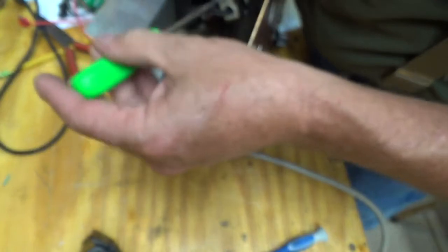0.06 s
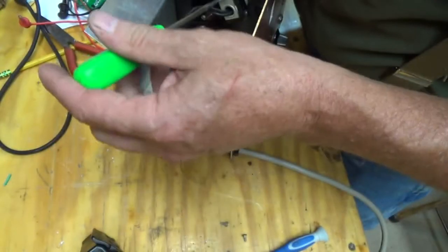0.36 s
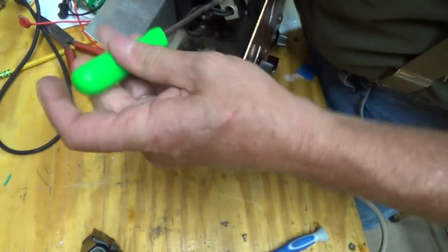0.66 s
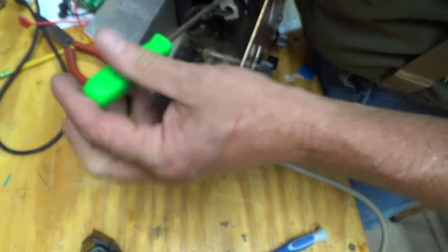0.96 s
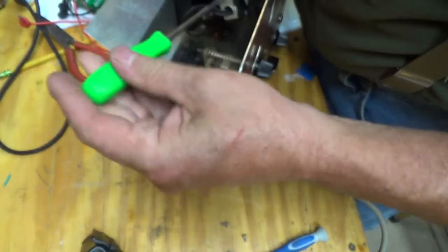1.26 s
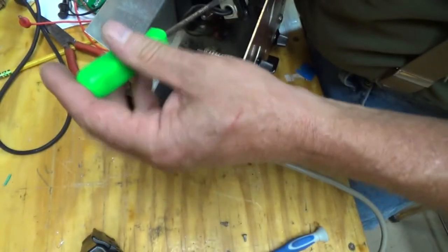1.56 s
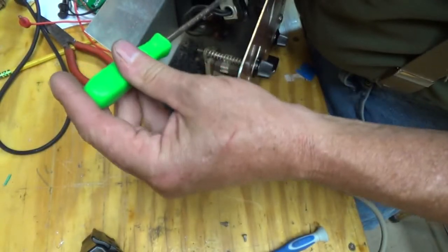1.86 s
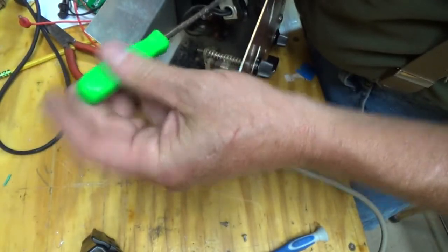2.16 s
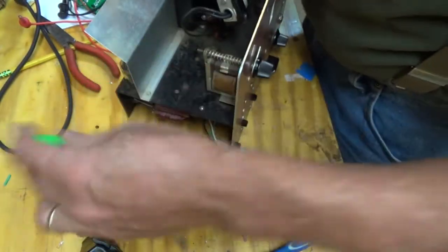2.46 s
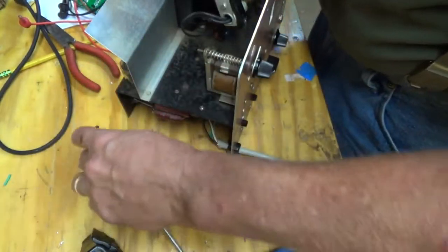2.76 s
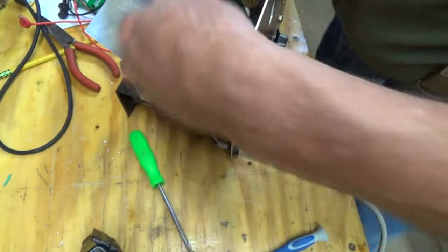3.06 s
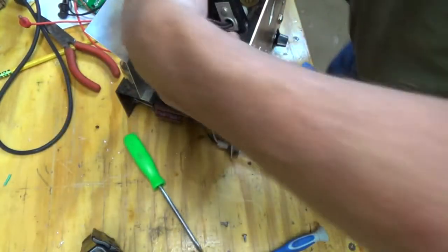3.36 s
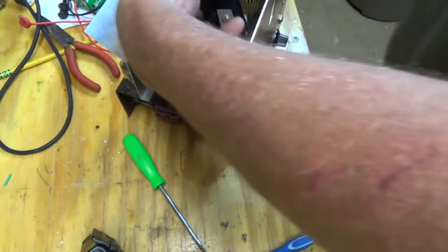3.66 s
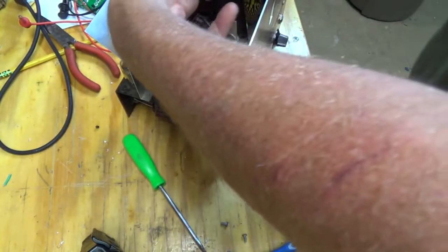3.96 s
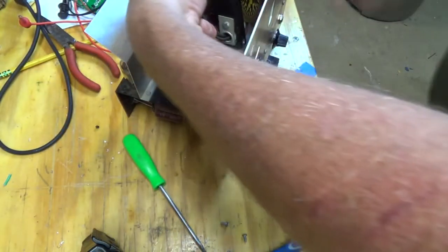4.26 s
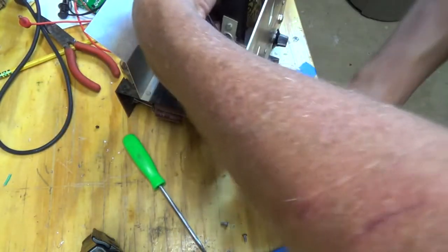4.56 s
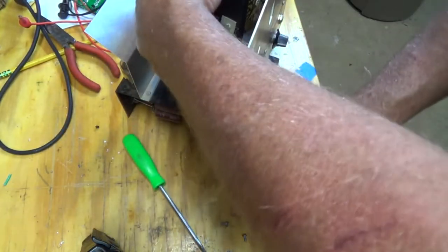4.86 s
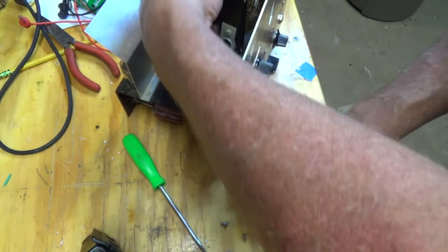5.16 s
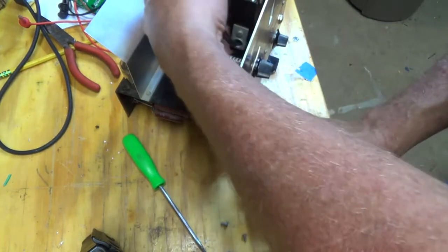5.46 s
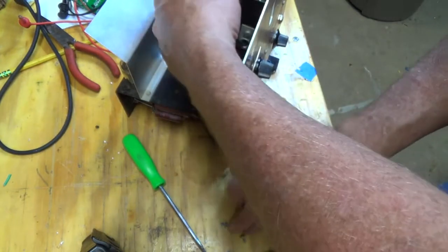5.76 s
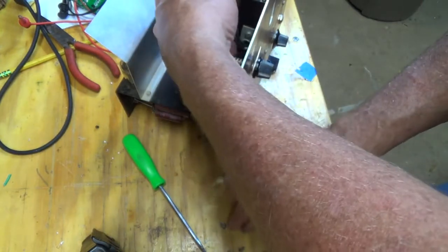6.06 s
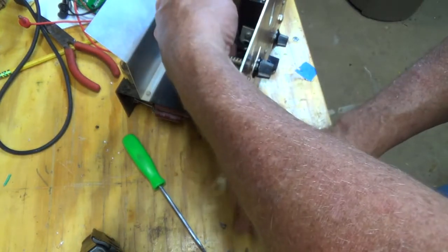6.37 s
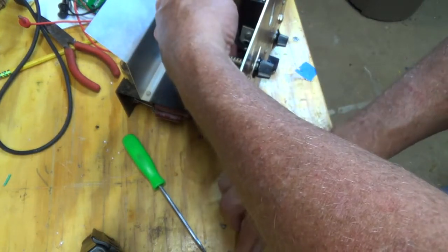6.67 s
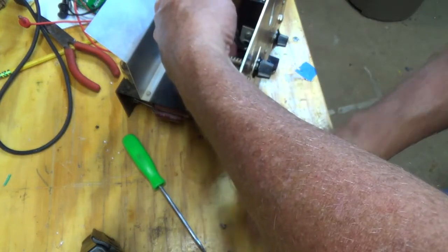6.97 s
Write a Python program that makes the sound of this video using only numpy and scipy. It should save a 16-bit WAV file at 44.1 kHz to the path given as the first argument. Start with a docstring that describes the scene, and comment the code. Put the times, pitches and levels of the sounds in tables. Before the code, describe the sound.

Soft finger taps, a tool tumbling on wood, then rustling clothes and tinny knocks as a metal chassis is tipped.

```python
"""Sheet-metal chassis on a workbench

In a small workshop, fingers fiddle with a screwdriver and set it down; it tumbles on the wooden bench
and rolls to rest. Clothes rustle and a hand hisses over the chassis, which scrapes, knocks and clanks
as it is tipped, a low boom after each knock. Room air, mains hum and a picture tube's whine lie beneath."""
import sys
import numpy as np
from scipy import signal
from scipy.fft import rfft, irfft, next_fast_len
from scipy.io import wavfile
from scipy.ndimage import uniform_filter1d, minimum_filter1d

SR = 44100
rng = np.random.default_rng(int(sys.argv[2]) if len(sys.argv) > 2 else 0)


def transcribe(signal):
    """Save signal, clipped to [-1, 1], as a 16-bit WAV file at the path in sys.argv[1]."""
    frames = np.atleast_2d(signal).T
    limited = np.clip(frames, -1, 1)
    pcm = np.round(limited * 32767).astype(np.int16)
    wavfile.write(sys.argv[1], SR, pcm)


N = 313551
BLOW_SIZE = 2 ** 15   # samples for one hit and its tail
TIME = np.arange(N) / SR
AGE = TIME[:BLOW_SIZE]

# The woody ring of the bench. Each row: pitch in Hz, relative level in dB, t60 in seconds.
BENCH_MODES = [(138.5, -7, 0.5), (205.7, -20, 1), (283, 2.5, 0.24), (344, -8, 0.15), (468, -17, 0.69),
               (542, -21.5, 0.0754), (691, -8, 0.22), (1234, -2, 0.17), (1173, -9.5, 0.58),
               (1307, -15, 0.7), (1476, -18.5, 0.22), (1630, -5, 0.147), (1510, -2, 0.28),
               (1817, 5.5, 0.088), (1890, -5, .22)]
# The tinny ring of the chassis. Each row: pitch in Hz, relative level in dB, t60 in seconds.
CHASSIS_MODES = [(286.5, 2.5, 0.45), (404, -6, 0.72), (564.3, -1.5, 0.48), (768, 0.5, 0.45), (872, 7, 0.26),
                 (949, 10, 0.11), (1010, 12, 0.05), (1050, -1, 0.12), (1431, 11, 0.092), (1550, -17, 0.11),
                 (1748, 9, 0.053), (1927, 0.5, 0.14), (2454, -2, 0.15), (3010, -16, 0.14), (3610, -4, 0.1),
                 (5080, -11.5, 0.13)]
# Knocks of the chassis. Each row: start in seconds, strength in dB, hardness in dB,
# pitch of the struck spot in Hz, strength of the following boom in dB.
CHASSIS_KNOCKS = [(3.74, -44, -6, 890, -46), (4.236, -24, -1.5, 1363, -36), (4.254, -40, -2, 1190, -62),
                  (4.405, -33, -2.5, 1160, -32.5), (4.741, -43.5, 20.5, 1290, -29),
                  (4.774, -47.5, 15, 1300, -60), (4.878, -58.5, -8, 1300, -43),
                  (5.621, -56, 6.5, 1330, -61), (5.691, -30.5, 16, 1430, -31.5),
                  (5.967, -58, 10, 1510, -47.5), (6.046, -40, 3.5, 1500, -46),
                  (6.144, -43, -6.5, 1220, -40), (6.172, -49.5, -1, 1110, -72)]


def from_db(db):
    """Decibels to gain."""
    return 10 ** (np.asarray(db) / 20)


def rms(x):
    """Root mean square."""
    return np.sqrt(np.mean(x ** 2) + 1e-24)


def unit_energy(x):
    """Scale to an average energy of 1 per channel."""
    return x / (rms(x) * np.sqrt(x.shape[-1]))


def db_by_bin(points, size):
    """A curve of (Hz, dB) points read on the bins of a transform."""
    hz, db = np.transpose(points)
    return np.interp(np.log(np.fft.rfftfreq(size, 1 / SR) + 1), np.log(hz), db)


def decay(t60):
    """Envelope that falls 60 dB in t60 seconds."""
    return np.exp(-np.log(1000) * AGE / t60)


def swell(s, db, rise_s, fall_s):
    """Gain of a movement that peaks at s; it climbs 20 dB in rise_s and sinks 20 dB in fall_s."""
    distance = np.maximum((s - TIME) / rise_s, (TIME - s) / fall_s)
    return from_db(db - 20 * distance.clip(max=10))


def strokes(rows, fall_share=0.45):
    """Gain of a series of hand or arm strokes, each fading faster than it rose."""
    return np.sqrt(sum(swell(s, db, rise_s, fall_share * rise_s) ** 2 for s, db, rise_s in rows))


def tone(hz, db, phase=0):
    """A sine at an rms level in dB, with its phase in cycles."""
    return np.sqrt(2) * from_db(db) * np.sin(2 * np.pi * (hz * TIME + phase))


def stereo_noise(size, side_db=-14):
    """White noise, nearly the same in both channels."""
    mid, side = rng.standard_normal((2, size))
    return mid + from_db(side_db) * side * [[1], [-1]]


def coloured_noise(colour, width=((20, -14), (20000, -14))):
    """Steady stereo noise with a given spectrum and width; rms 1."""
    size = next_fast_len(N, True)
    mid, side = rfft(rng.standard_normal((2, size)))
    pair = mid + side * from_db(db_by_bin(width, size)) * [[1], [-1]]
    noise = irfft(pair * from_db(db_by_bin(colour, size)), size)[:, :N]
    return noise / rms(noise)


def click(colour):
    """The tightest causal pulse with a given spectrum."""
    cepstrum = irfft(np.log(from_db(db_by_bin(colour, BLOW_SIZE))))
    cepstrum[1:BLOW_SIZE // 2] *= 2
    cepstrum[BLOW_SIZE // 2 + 1:] = 0
    return unit_energy(irfft(np.exp(rfft(cepstrum))))


def ringing(modes, scatter_db=1.2, pan_spread=.1):
    """Decaying modes; strength, sign and pan are drawn anew, as each blow lands somewhere else."""
    out = 0
    for hz, db, t60 in modes:
        gain = rng.choice([-1, 1]) * from_db(db + scatter_db * rng.standard_normal())
        pan = 1 + pan_spread * rng.standard_normal() * np.array([[1], [-1]])
        out = out + gain * pan * np.sin(2 * np.pi * hz * AGE) * decay(t60)
    return unit_energy(out)


def blows(rows, shares, colour, modes, chatter_db, chatter_t60, spot_db, spot_t60,
          ring_db, room_db, side_db):
    """Each hit is a click, a brief chatter, the ping of the struck spot, body ring and room tail."""
    # The four registers of a hit: knock, thud, clack, tick. Each row: low edge in Hz, high edge in Hz,
    # t60 of the room tail in seconds, relative tail level in dB.
    registers = [(633, 1610, 0.28, 4.5), (81, 647, 0.41, -1.5), (2013, 5150, 0.32, -2.5),
                 (6120, 11600, 0.27, -5)]
    out = np.zeros((2, N + BLOW_SIZE))
    pulse = rfft(click(colour))
    bands = [signal.butter(3, [lo, hi], "band", fs=SR, output="sos") for lo, hi, _, _ in registers]
    build_up = 1 - np.exp(-AGE / 0.0028)   # reflections take a moment to arrive
    tails = [from_db(db) * unit_energy(build_up * decay(t60)) for _, _, t60, db in registers]
    for s, strength_db, hardness_db, spot_hz in rows:
        contact = from_db(chatter_db) * unit_energy(rng.standard_normal(BLOW_SIZE) * decay(chatter_t60))
        contact[0] += 1   # the click itself
        spot = from_db(spot_db) * unit_energy(np.sin(2 * np.pi * spot_hz * AGE) * AGE * decay(spot_t60))
        direct = irfft(rfft(contact) * pulse) + spot + from_db(ring_db) * ringing(modes)
        diffuse = from_db(room_db) * irfft(rfft(stereo_noise(BLOW_SIZE, side_db)) * pulse)
        start = round(s * SR)
        # hardness shifts the balance of the registers, each levelled on its first 20 ms
        for band, tail, (share_db, slope) in zip(bands, tails, shares):
            part = signal.sosfilt(band, direct + diffuse * tail)
            strength = from_db(strength_db + share_db + slope * hardness_db)
            out[:, start:start + BLOW_SIZE] += strength * part / rms(part[:, :SR // 50])
    return out[:, :N]


def room_air(level_db=-59):
    """The low, steady hush of a still room."""
    # Colour of the hush. Each row: frequency in Hz, relative noise density in dB.
    colour = [(15, -48.5), (25, -41.5), (69, -5), (93, -13), (118, 4.5), (167, -14), (196, -8.5),
              (501, -13.5), (709, -14.5), (1310, -18), (1630, -18.5), (3350, -20), (5420, -24),
              (13800, -24.5), (15000, -27.5)]
    # Its stereo width. Each row: frequency in Hz, side against mid in dB.
    width = [(30, 7.5), (70, -69.5), (250, -7), (1000, -11.5), (4000, -24), (12000, -15)]
    return from_db(level_db) * coloured_noise(colour, width)


def mains_hum(waver_db=1.3):
    """Mains hum and a faint motor tone, wavering a little in level."""
    # The tones of the hum. Each row: pitch in Hz, level in dB.
    partials = [(60, -83), (119.7, -64.5), (179.5, -78.5), (434.6, -82)]
    knots = np.linspace(0, TIME[-1], num=50)
    out = 0
    for hz, db in partials:
        waver = np.interp(TIME, knots, rng.standard_normal(len(knots)))
        out = out + tone(hz, db + waver_db * waver, rng.random())
    return out


def tube_whine(line_hz=15734.3, field_hz=59.94, whine_db=-64.5, sideband_db=-11, fall_db=2.3):
    """A picture tube's line whistle, with ever weaker tones below it spaced at the field rate."""
    levels = [whine_db] + [whine_db + sideband_db - fall_db * k for k in range(7)]
    return sum(tone(line_hz - k * field_hz, db, rng.random()) for k, db in enumerate(levels))


def beating_whine():
    """A second thin whistle just above the tube's; the two beat."""
    return tone(hz=15747.3, db=-69)


def fingers(spot_hz=657):
    """Fingers tap the tool and small parts, with a short dull rub of skin as they grip."""
    # The touches. Each row: time in seconds, strength in dB, hardness in dB, rub level in dB.
    touches = [(0.362, -53.5, 1.5, -57.5), (0.619, -69, 3, -54.5), (0.769, -61.5, 30.5, -66),
               (1.272, -64, 8.5, -59), (1.398, -62.5, 1, -57), (1.735, -69, -13, -62),
               (2.002, -61, -21, -55), (2.228, -63.5, 14, -70), (2.511, -61.5, -3, -79),
               (6.751, -75, -10, -53), (6.909, -62.5, -10, -56)]
    # A tap's knock, thud, clack and tick. Each row: offset in dB, dB gained per dB of hardness.
    shares = [(1, -0.1), (0.5, -.05), (-15, 0.89), (-8, 0.92)]
    # Colours of the tap and of the rub. Each row: frequency in Hz, relative density in dB.
    tap_colour = [(90, 5), (250, 4.5), (500, 0), (1000, -8), (2000, -16.5), (5000, -17.5), (10000, -12),
                  (15000, -5.5)]
    rub_colour = [(90, -22), (260, 43.5), (500, 37.5), (1000, -22), (2000, 9), (5000, -14), (10000, -46),
                  (15000, -60)]
    hits = [(s, db, hardness_db, spot_hz) for s, db, hardness_db, _ in touches]
    taps = blows(hits, shares, tap_colour, BENCH_MODES, chatter_db=9.5, chatter_t60=0.018,
                 spot_db=-8, spot_t60=0.045, ring_db=-17, room_db=0.5, side_db=-17)
    grip = sum(swell(s, rub_db, rise_s=0.029, fall_s=0.089) for s, _, _, rub_db in touches)
    return taps + grip * coloured_noise(rub_colour)


def screwdriver(spot_hz=1390, hardness_db_per_octave=30):
    """The tool tumbles on the wood and rolls to rest; harder contacts ring higher."""
    # The tumble: the shaft hits hard, the handle soft.
    # Each row: start in seconds, strength in dB, hardness in dB.
    tumble = [(2.643, -23, -1.5), (2.667, -27, 1.5), (2.799, -47, 1.5), (2.838, -42, 0.5),
              (2.889, -15.5, 2), (2.907, -27.5, 9.5), (2.916, -25, 10), (3.0, -14.5, 4),
              (3.011, -32, -10.5), (3.079, -30, 7), (3.085, -20.5, 2.5), (3.093, -22, 9.5),
              (3.113, -25.5, 2), (3.128, -25.5, 3), (3.164, -22, 1.5), (3.173, -23.5, -1.5),
              (3.211, -21.5, -0.5), (3.234, -24.5, -2)]
    # The tool's knock, thud, clack and tick. Each row: offset in dB, dB gained per dB of hardness.
    shares = [(0, 0), (-1, -0.38), (-12, 1.5), (-29, 0.8)]
    # Colour of a hit on the bench top. Each row: frequency in Hz, relative density in dB.
    colour = [(41, -58), (70, -55.5), (128, -5.5), (172, -21.5), (282, -1.5), (395, -5), (565, -8),
              (618, -15.5), (757, -8.5), (866, -25), (947, -10), (1520, -10.5), (3110, -20), (6250, -41.5),
              (15000, -53)]
    hits = [(s, db, hardness_db, spot_hz * 2 ** (hardness_db / hardness_db_per_octave))
            for s, db, hardness_db in list(tumble) + handle_roll()]
    return blows(hits, shares, colour, BENCH_MODES, chatter_db=6, chatter_t60=0.036,
                 spot_db=2, spot_t60=0.011, ring_db=5, room_db=4, side_db=-17)


def handle_roll(count=15, first_gap_s=.021, gap_growth=1.045, hardness_db=-2.5, softening_db_per_s=83):
    """Contacts of the handle as it drops from facet to facet, ever slower and softer."""
    # The fading force of the roll. Each row: time in seconds, strength in dB.
    force = [(3.274, -31.5), (3.345, -27.5), (3.38, -38), (3.405, -46), (3.55, -47.5), (3.631, -78)]
    s, db = np.transpose(force)
    gaps = first_gap_s * gap_growth ** np.arange(count)
    elapsed = np.cumsum(gaps) - gaps
    return [(s[0] + t, np.interp(s[0] + t, s, db), hardness_db - softening_db_per_s * t)
            for t in elapsed]


def hand_slide():
    """Skin sliding over sheet metal hisses in a few high resonances."""
    # Strokes of the hand. Each row: peak time in seconds, level in dB, rise in seconds.
    moves = [(3.55, -57.5, 0.76), (3.66, -44, .13)]
    # Resonances of the hiss. Each row: centre in Hz, width in Hz, relative level in dB.
    peaks = [(6040, 270, -11.5), (7800, 870, -20.5), (9530, 500, 1), (10800, 900, -6.5), (11700, 650, -6),
             (13300, 800, -12.5)]
    friction = stereo_noise(N)
    hiss = sum(from_db(db) * signal.lfilter(*signal.iirpeak(hz, hz / width, fs=SR), friction)
               for hz, width, db in peaks)
    return strokes(moves) * hiss / rms(hiss)


def clothes_rustle(boost_db=10, grain_db=1.5, grain_s=0.0011):
    """Cloth and skin catch and let go, so their brushing is grainy."""
    # Strokes of clothes and arm. Each row: peak time in seconds, relative level in dB, rise in seconds.
    moves = [(3.495, -57, 0.057), (3.72, -59, .25), (3.94, -57, 0.2), (4.16, -58.5, 0.24),
             (4.58, -70.5, 0.29), (4.8, -65, 0.84), (5.168, -68, 0.15)]
    # Colour of the brushing. Each row: frequency in Hz, relative noise density in dB.
    colour = [(150, 4.5), (400, 2.5), (900, 5), (1700, 3), (3200, -0.5), (5500, -5), (9500, -3.5),
              (15500, -10)]
    catches = rng.standard_normal(N // 20)
    grain = from_db(grain_db * np.interp(TIME / grain_s, np.arange(len(catches)), catches))
    return from_db(boost_db) * grain / rms(grain) * strokes(moves) * coloured_noise(colour)


def chassis_scrapes(slips_per_s=2500, growth_db_per_s=122, release_db_per_s=294):
    """Tiny slips on the wood ring the chassis; friction builds under the push, then lets go."""
    # The drags. Each row: start in seconds, length of the push in seconds, level at its end in dB.
    drags = [(3.691, 0.064, -41.5), (4.693, 0.044, -37.5), (6.674, 0.013, -44.5)]
    # Colour of the scrape. Each row: frequency in Hz, relative density in dB.
    colour = [(200, -4.5), (440, 1), (570, 3.5), (680, -5), (850, 1), (1150, -28), (1500, 0), (2000, -11.5),
              (3000, -14.5), (4500, -28), (12000, -24)]
    slips = (rng.random(N) < slips_per_s / SR) * (rng.random(N) - .5)
    body = unit_energy(click(colour) + ringing(CHASSIS_MODES))
    push = 0
    for s, length_s, db in drags:
        past_peak = TIME - s - length_s
        shape_db = np.minimum(growth_db_per_s * past_peak, -release_db_per_s * past_peak)
        push = push + (TIME > s) * from_db(db + shape_db)
    force = slips / rms(slips) * uniform_filter1d(push, size=400)
    return signal.fftconvolve(force[None], body)[:, :N]


def chassis_clanks():
    """The sheet metal knocks against the bench and its own loose parts."""
    # The metal's knock, thud, clack and tick. Each row: offset in dB, dB gained per dB of hardness.
    shares = [(0, -0.04), (-8, 0.025), (-11, 0.94), (-17.5, 0.79)]
    # Colour of a hit on the chassis. Each row: frequency in Hz, relative density in dB.
    colour = [(90, 6.5), (280, 2.5), (600, -5.5), (800, 5), (1100, -0.5), (1450, -2), (2000, -5.5),
              (2450, -6), (3300, -11), (4700, -16), (6000, -26.5), (8500, -24), (15000, -34)]
    hits = [row[:4] for row in CHASSIS_KNOCKS]
    return blows(hits, shares, colour, CHASSIS_MODES, chatter_db=9, chatter_t60=0.032,
                 spot_db=5, spot_t60=0.0092, ring_db=8.5, room_db=6, side_db=-25)


def low_boom(lag_s=0.0085, swell_s=0.017):
    """A deep boom swells and dies just after each chassis knock."""
    # Deep modes of the boom. Each row: pitch in Hz, relative level in dB, t60 in seconds.
    modes = [(108.4, -12, 0.63), (138, -0.5, 0.43), (266, -21, 0.88)]
    ring = sum(from_db(db) * np.sin(2 * np.pi * hz * AGE) * decay(t60) for hz, db, t60 in modes)
    boom = (1 - np.exp(-AGE / swell_s)) * ring
    triggers = np.zeros(N)
    for s, *_, boom_db in CHASSIS_KNOCKS:
        triggers[round((s + lag_s) * SR)] = from_db(boom_db)
    return signal.fftconvolve(triggers, boom)[:N]


def standing_waves(x):
    """Standing waves gather the bass on the right; the higher bands lean a little either way."""
    # The stereo lean. Each row: frequency in Hz, left minus right in dB.
    balance = [(60, -9.0), (110, -11.5), (200, -6.5), (380, -1.5), (700, -1.5), (1290, 0.5), (2380, 1),
               (4400, 1), (8120, 3.5), (15000, -5.5)]
    size = next_fast_len(N + BLOW_SIZE, True)
    gains = from_db(db_by_bin(balance, size) * [[.5], [-.5]])
    return irfft(rfft(x, size) * gains / gains.mean(axis=0), size)[:, :N]


def scene():
    """Bench work and body movement over a bed of air, hum and whine."""
    handling = screwdriver() + chassis_clanks() + low_boom() + fingers() + chassis_scrapes()
    rustle = clothes_rustle()
    air = room_air()
    handling_and_hum = standing_waves(handling + mains_hum())
    return handling_and_hum + hand_slide() + rustle + air + tube_whine() + beating_whine()


def record(dry, ceiling=.38, cutoff_hz=16100):
    """A fast limiter holds the peaks, then a steep low-pass cuts the very top."""
    gain = np.minimum(1, ceiling / (np.abs(dry).max(axis=0) + 1e-9))
    gain = uniform_filter1d(minimum_filter1d(gain, size=130), size=130)
    low_pass = signal.ellip(10, .1, 90, cutoff_hz, fs=SR, output="sos")
    return signal.sosfilt(low_pass, dry * gain)


dry = scene()
out = record(dry)
transcribe(out)
```